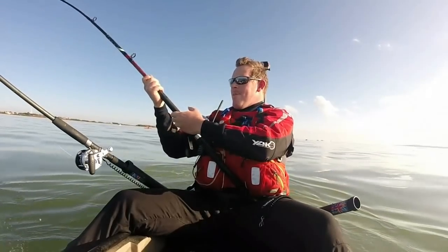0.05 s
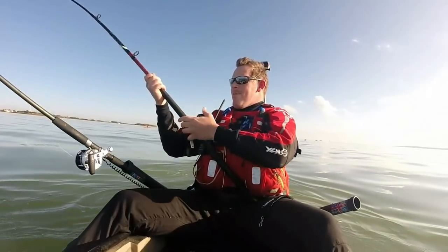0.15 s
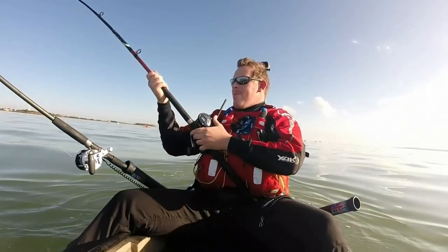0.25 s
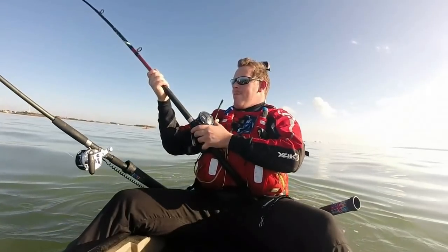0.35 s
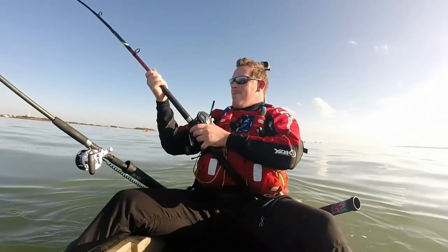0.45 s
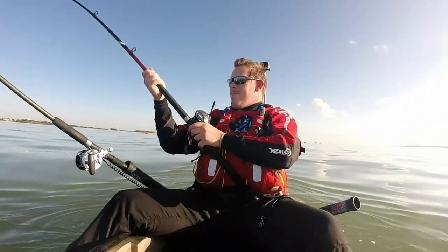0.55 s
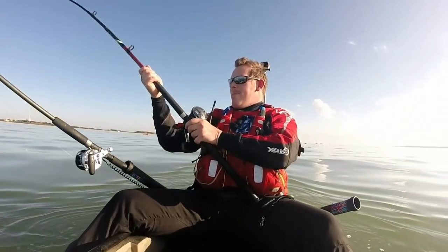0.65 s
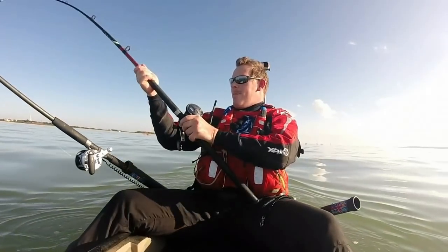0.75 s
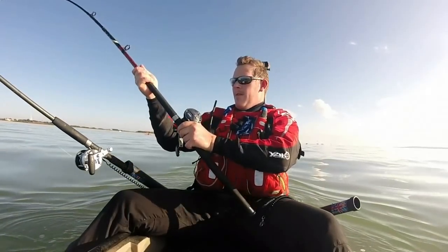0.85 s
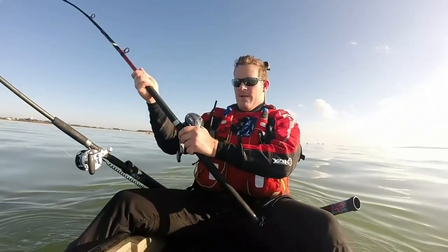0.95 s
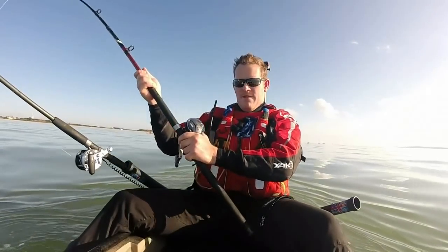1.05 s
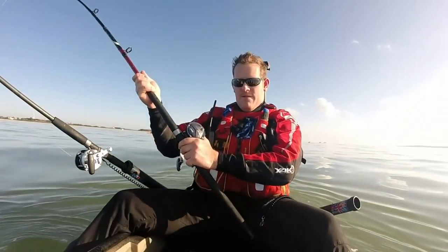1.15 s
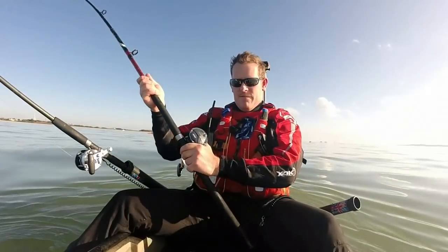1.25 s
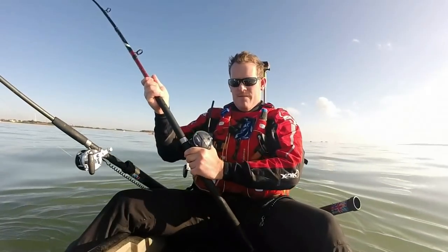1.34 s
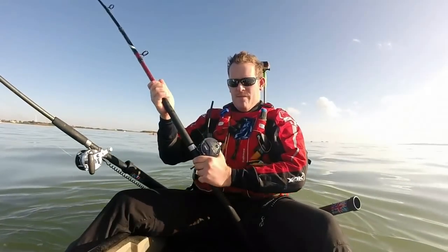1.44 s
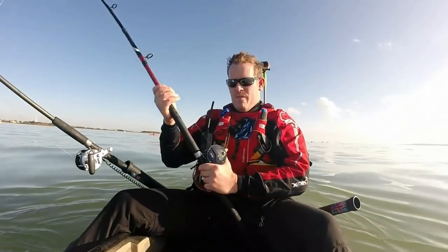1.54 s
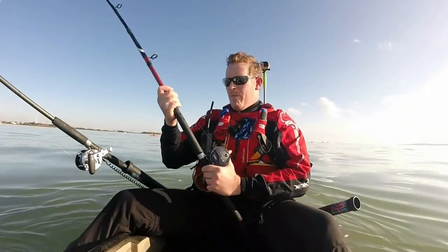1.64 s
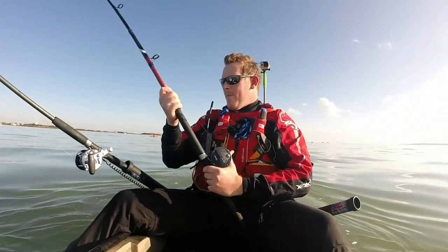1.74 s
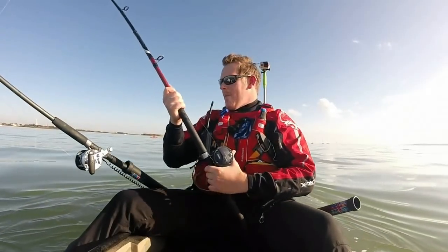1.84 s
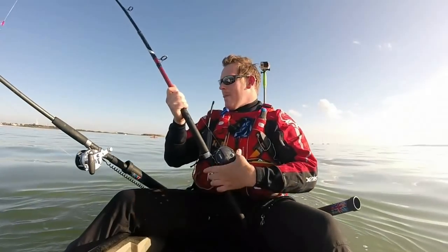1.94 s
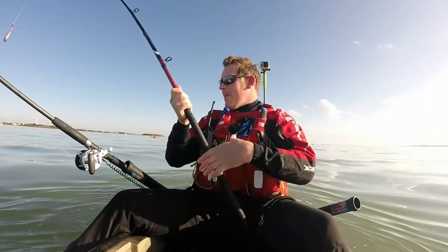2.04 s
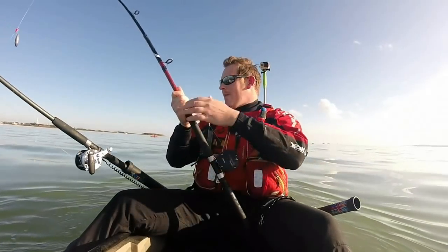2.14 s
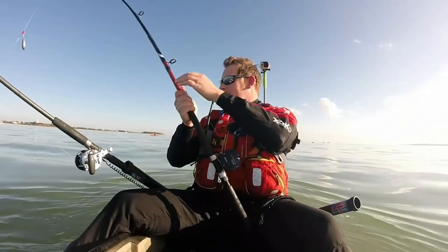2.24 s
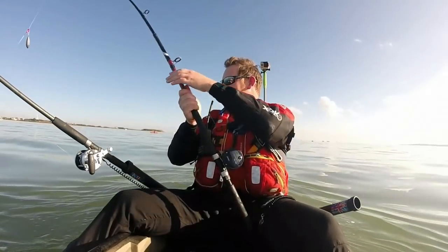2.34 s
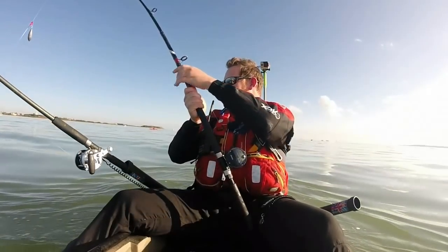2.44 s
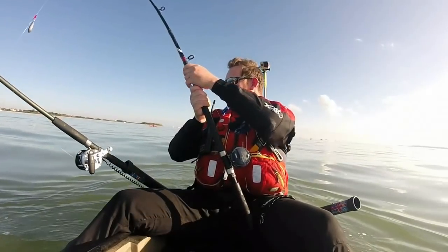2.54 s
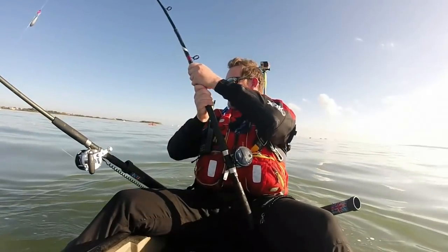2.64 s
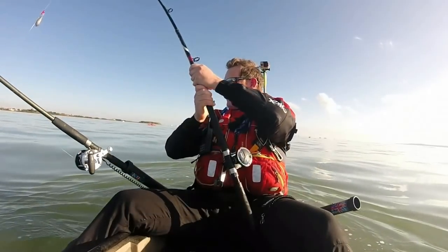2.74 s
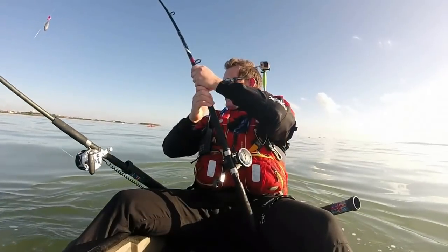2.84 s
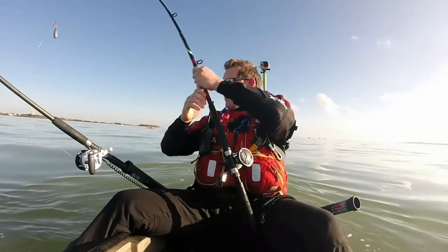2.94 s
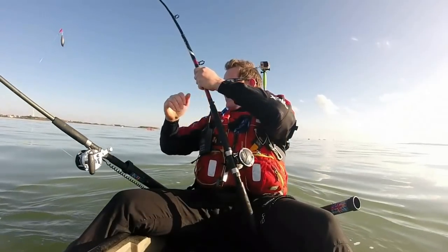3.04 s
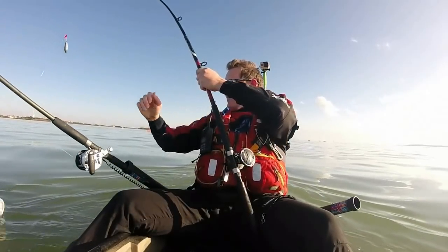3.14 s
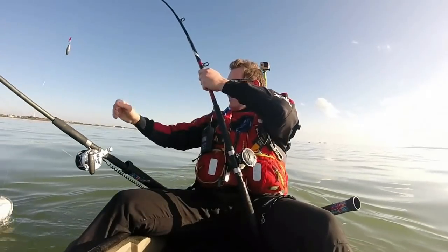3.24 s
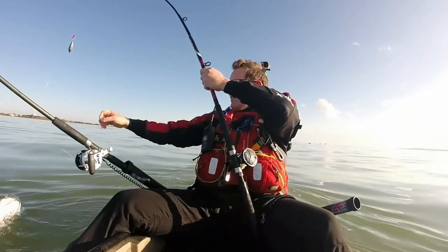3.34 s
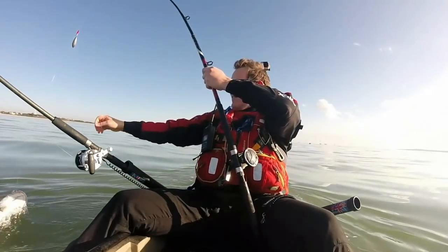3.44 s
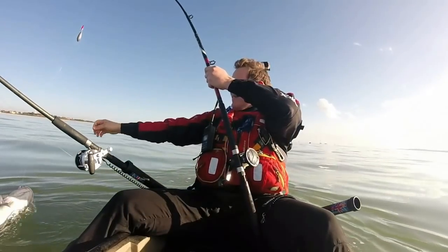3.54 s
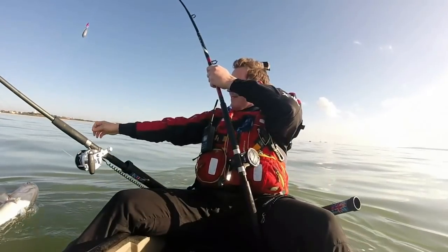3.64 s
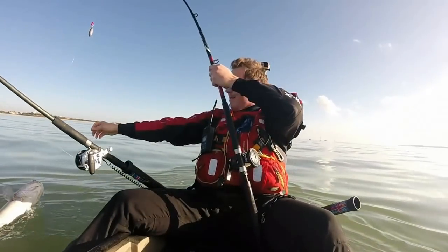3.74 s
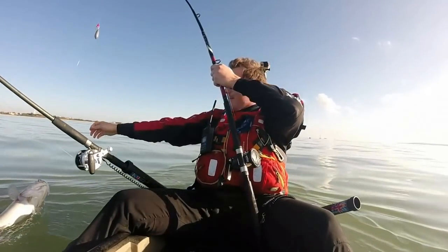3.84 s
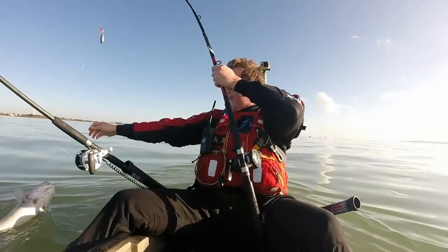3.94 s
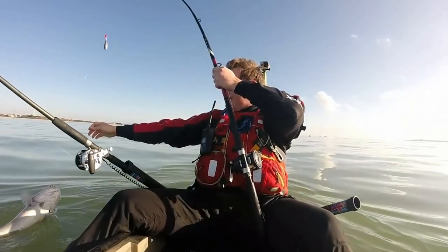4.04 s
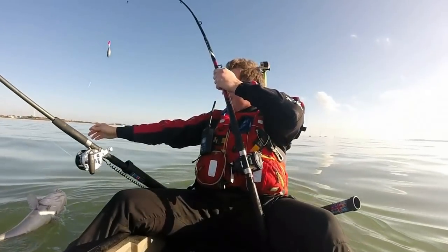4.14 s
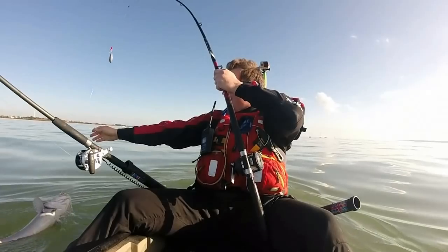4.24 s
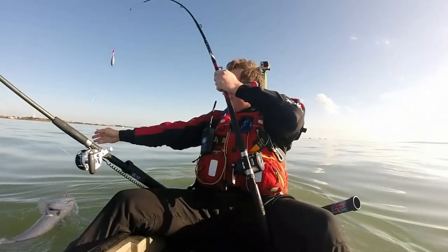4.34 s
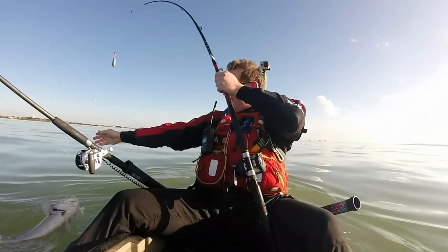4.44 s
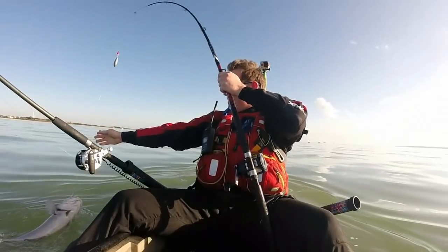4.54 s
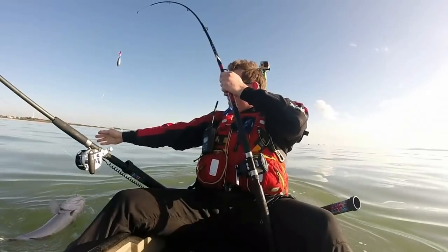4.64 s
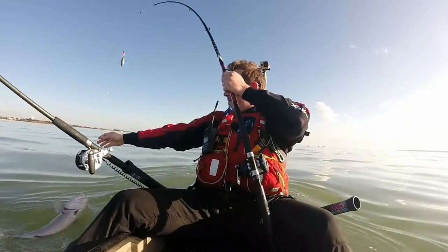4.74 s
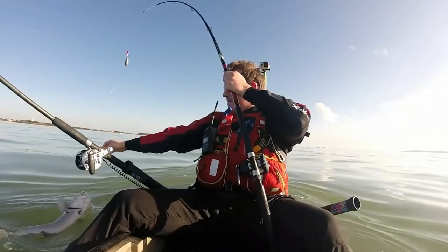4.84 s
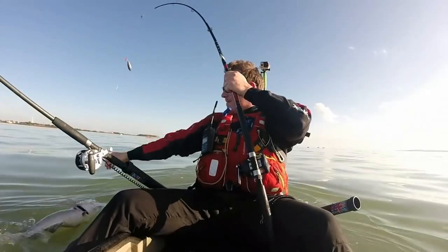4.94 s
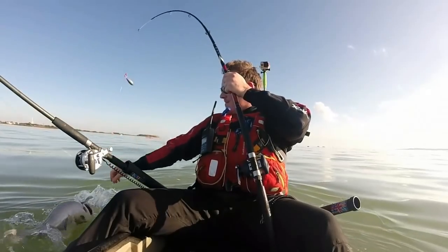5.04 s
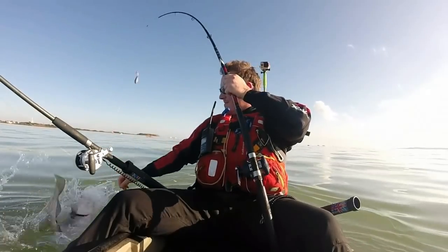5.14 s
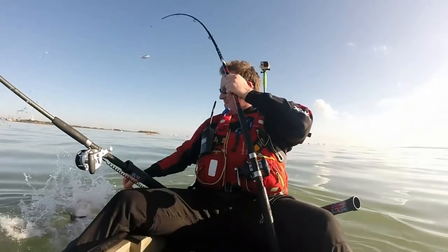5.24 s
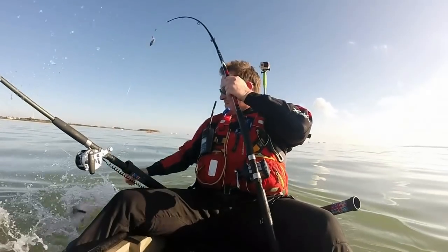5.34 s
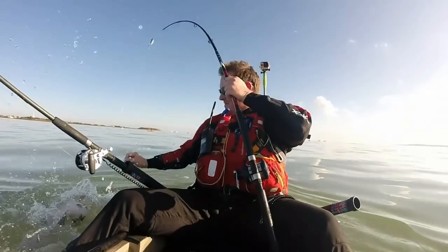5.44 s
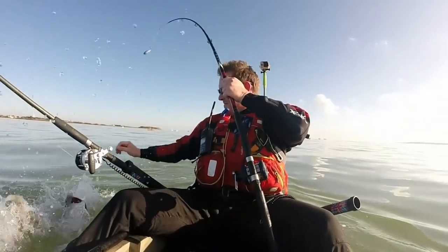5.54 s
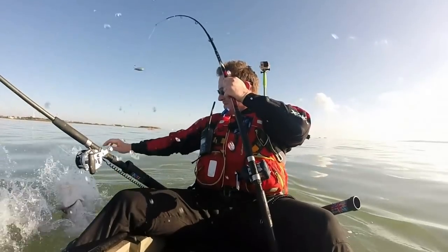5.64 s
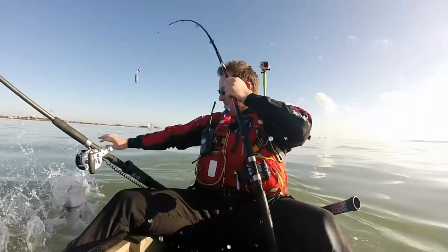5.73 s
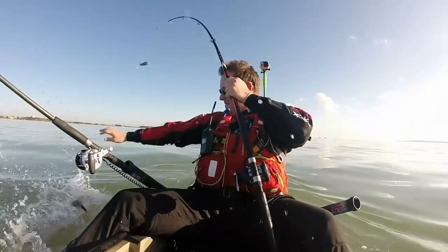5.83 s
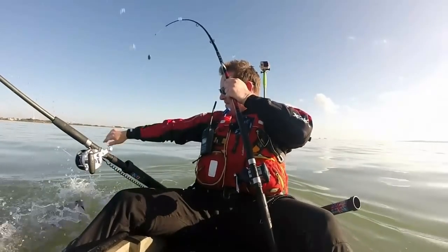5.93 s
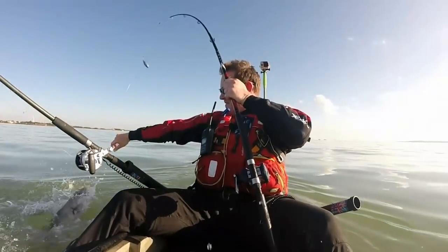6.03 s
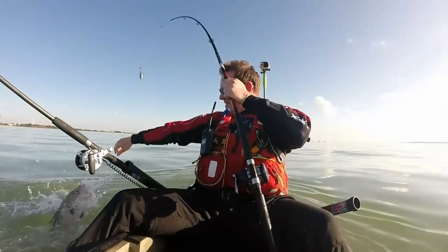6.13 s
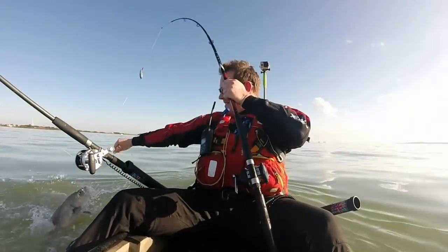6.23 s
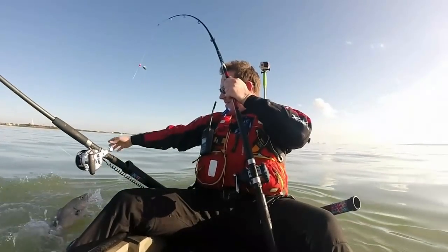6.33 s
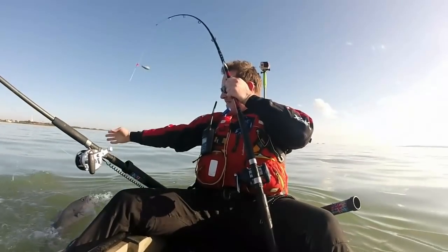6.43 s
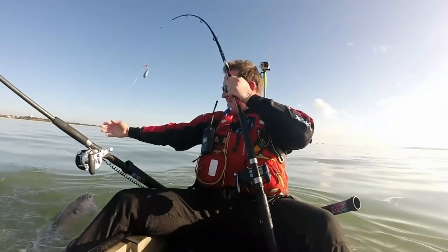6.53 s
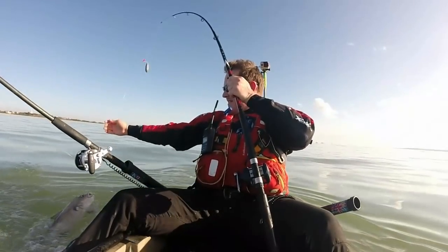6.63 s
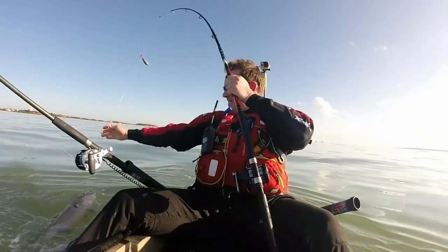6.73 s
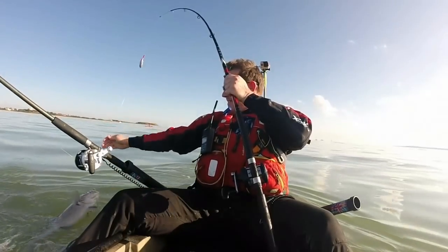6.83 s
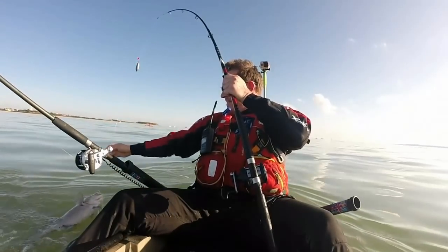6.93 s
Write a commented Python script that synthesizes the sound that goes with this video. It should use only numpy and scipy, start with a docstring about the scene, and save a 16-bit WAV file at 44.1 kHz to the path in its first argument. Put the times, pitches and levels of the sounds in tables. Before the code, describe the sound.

Calm open water heard from inside a waterproof case fixed to a hollow plastic kayak. Small rising bubble plips and faint lapping sit over low rumble and a barely audible hum. Gear thuds softly on the deck, with a harder knock about two seconds in. Later water presses and scrubs along the hull, then a fish thrashes: deep booms, slapping splashes, spray and sharp droplet ticks, settling back to plips.

```python
"""Water laps, churns and drums on the hollow plastic hull of a fishing kayak drifting on calm water.
The microphone is close: inside a camera's waterproof case fixed to the hull, whose resonances colour the water.
Ripples plip as rising bubble notes, wind and swell are narrow-band rumbles, and a faint drone wavers.
Gear knocks on the deck as decaying modes. A hooked fish slides alongside, then thrashes:
surges of filtered noise and ringing grains make churn and spray, and sharp clicks make drops on the case."""
import sys
import numpy as np
from scipy import signal
from scipy.fft import rfft, irfft, next_fast_len
from scipy.io import wavfile
from scipy.ndimage import uniform_filter1d

SR = 44100
rng = np.random.default_rng(int(sys.argv[2]) if len(sys.argv) > 2 else 0)


def store_wav(level_fs):
    """Save 16-bit WAV to argv[1]."""
    pcm = np.round(np.clip(np.atleast_2d(level_fs), -1, 1) * 32767)
    wavfile.write(sys.argv[1], SR, pcm.T.astype(np.int16))


N = 307818
T = np.arange(N) / SR   # time [s]

# Colour of churning water ahead of the case: (frequency [Hz], relative level [dB])
CHURN_SPECTRUM = [(200, -24), (420, 9.5), (560, 6), (780, 4.5), (1100, 1), (1420, -4), (1800, -6),
                  (2700, -4), (3300, -8.5), (6000, -18), (12000, -58)]


def from_db(db):
    """Decibels to gain."""
    return 10 ** (np.asarray(db) / 20)


def rms_one(x):
    """Scale to unit rms."""
    return x / np.sqrt(np.mean(x ** 2) + 1e-20)


def peak_one(x):
    """Scale to unit peak."""
    return x / (np.abs(x).max() + 1e-20)


def in_time(rows):
    """Interpolate each column of a curve at every sample."""
    s, *columns = np.transpose(rows)
    return [np.interp(T, s, column) for column in columns]


def add(out, s, sound):
    """Mix a short sound in at time s."""
    i = max(round(s * SR), 0)
    out[i:i + len(sound)] += sound[:max(N - i, 0)]


def drift(per_s):
    """Random wandering of unit rms: straight lines between per_s random values a second."""
    knots = rng.standard_normal(4096)
    return rms_one(np.interp(T * per_s, np.arange(len(knots)), knots))


def colour(x, spectrum):
    """Causal (minimum-phase) filter with the given spectrum, so impacts keep a sharp start."""
    size = 2 * next_fast_len(len(x) // 2 + 1024)
    hz, db = np.transpose(spectrum)
    bin_hz = np.arange(size // 2 + 1) * SR / size
    log_gain = np.log(from_db(np.interp(np.log(bin_hz + 1), np.log(hz), db)))
    # folding the cepstrum onto positive times gives the minimum phase
    cepstrum = irfft(log_gain)
    cepstrum[1:size // 2] *= 2
    cepstrum[size // 2 + 1:] = 0
    response = np.exp(rfft(cepstrum))
    return irfft(rfft(x, size) * response)[:len(x)]


def resonate(x, hz, width_hz):
    """Two-pole resonance with gain 1 on top."""
    r = np.exp(-np.pi * width_hz / SR)
    zeros = np.array([1, 0, -1]) * (1 - r * r) / 2
    poles = [1, -2 * r * np.cos(2 * np.pi * hz / SR), r * r]
    return signal.lfilter(zeros, poles, x + 1e-18)


def case(x):
    """The waterproof case favours sound at its own resonances, applied one after another."""
    # Case resonances: (frequency [Hz], width [Hz], boost, or cut if negative [dB])
    case_modes = [(1033, 213, 4.5), (1726, 360, 6.5), (2280, 58, 5), (2694, 190, 8.5), (3560, 130, 2.5),
                  (4245, 230, 5), (6287, 286, 13), (7540, 140, 1.5), (8100, 790, -2), (11600, 1200, -3),
                  (13300, 600, 6)]
    for hz, width_hz, boost_db in case_modes:
        x = x + (from_db(boost_db) - 1) * resonate(x, hz, width_hz)
    return x


def rumble(modes, even_s, order=3):
    """Random pressure in steep-sided resonances, its level evened to unit rms over about even_s."""
    x = 0
    for hz, width, db in modes:
        pressure = rng.standard_normal(N)
        # repeated passes steepen the sides; each pass is wider to make up for the narrowing
        for _ in range(order):
            pressure = resonate(pressure, hz, np.sqrt(2 * order) * width)
        x = x + from_db(db) * pressure
    size = int(even_s * SR) + 1
    power = uniform_filter1d(uniform_filter1d(x * x, size), size)
    return x / np.sqrt(np.abs(power) + 1e-20)


def grains(per_s, low_hz, high_hz, cycles, spread_db, count=24):
    """Bubbles and droplets of random size, each ringing for a few cycles at one of count pitches."""
    sizes = from_db(spread_db * np.minimum(rng.exponential(1, N), 4)) * rng.choice([-1, 1], N)
    # the root keeps the level even when grains come thicker
    clicks = sizes * (rng.random(N) < per_s / SR) / np.sqrt(per_s)
    dealt = rng.integers(0, count, N)
    pitches = np.geomspace(low_hz, min(high_hz, SR * 4 / 9), count)
    return rms_one(sum(resonate(clicks * (dealt == k), hz, 2 * hz / cycles)
                       for k, hz in enumerate(pitches)))


def surge():
    """Strength of the water the fish shoves along the side: each shove swells, holds and dies away."""
    # Shoves: (start [s], length before dying away [s], strength [dB])
    shoves = [(2.775, 0.091, -52.5), (3.78, 0.08, -48.5), (3.98, 0.28, -41.5), (4.378, 0.16, -40),
              (5.076, 0.24, -34.5), (5.367, 0.25, -34), (5.718, 0.079, -26.5), (5.863, 0.11, -30.5),
              (6.21, 0.47, -47.5), (6.81, 0.19, -49)]
    attack_s, release_s = 0.035, 0.05   # straight rise, exponential time constant
    strength = 0
    for s, length, db in shoves:
        swell = np.clip((T - s) / attack_s, 0, 1)
        dying = np.exp(-np.maximum(T - s - length, 0) / release_s)
        strength = strength + from_db(db) * swell * dying
    return strength


def hull(lump_db=3.0, lumps_per_s=16):
    """Wind and swell sway the boat; water and the fish's body drum and scrub along its resonances."""
    # Wind and rocking of the boat: (time [s], deep rumble level [dB])
    sway_curve = [(0, -29), (0.3, -41), (0.65, -43), (2.1, -46.5), (2.25, -22), (2.62, -48), (3.12, -46.5),
                  (3.66, -40.5), (3.87, -31.5), (4.65, -30.5), (4.92, -35.5), (5.38, -26), (5.47, -13.5),
                  (5.6, -23), (6.2, -31), (6.98, -39)]
    # Water pressing on the hull: (time [s], heave level [dB], drumming level [dB])
    wash_curve = [(0, -57.5, -49.5), (1.55, -58.5, -46), (1.9, -52.5, -56.5), (2.12, -52, -46.5),
                  (2.23, -34.5, -40), (2.6, -70, -51), (2.86, -41, -43.5), (3.05, -56, -52.5),
                  (3.7, -48.5, -43.5), (4.08, -30.5, -34.5), (4.42, -34, -35.5), (4.53, -21, -32.5),
                  (4.86, -35, -42.5), (5.2, -27, -27), (5.88, -24.5, -21.5), (6.08, -34, -33.5),
                  (6.44, -39, -43), (6.64, -30.5, -31.5), (6.98, -56.5, -43.5)]
    # Hull resonances, deepest first: (frequency [Hz], nominal width [Hz], relative gain [dB])
    sway_modes = [(16.9, 6.24, 6), (40.3, 10.4, -1)]
    heave_modes = [(75.5, 13, -7.5), (94.6, 12.6, -8.5)]
    boom_modes = [(125.4, 15.7, 7.5), (150, 32, -7.5), (180.5, 17.2, -5.5)]
    deck_modes = [(204, 34, -1.5), (263.8, 29.5, 4.5), (321.5, 12, -2), (550, 25.4, -16), (716, 130, -29),
                  (1062, 115, -21)]
    ripple_scrub_db = -58   # ripples on the hull between surges

    sway_db, = in_time(sway_curve)
    heave_db, boom_db = in_time(wash_curve)
    lumps = from_db(lump_db * drift(per_s=lumps_per_s))
    scrub = np.hypot(from_db(ripple_scrub_db), surge()) * lumps
    sway = from_db(sway_db) * rumble(sway_modes, even_s=0.091)
    heave = from_db(heave_db) * rumble(heave_modes, even_s=0.1)
    boom = from_db(boom_db) * rumble(boom_modes, even_s=0.45)
    deck = scrub * rumble(deck_modes, even_s=0.025)
    return sway + heave + boom + deck


def hum(centre_hz=168.5, level_db=-57, waver_hz=2.65, fade_db=3.5):
    """A faint sine whose pitch and level wander, as of a far engine across the water."""
    hz = centre_hz + waver_hz * drift(per_s=23)
    level = from_db(level_db + fade_db * drift(per_s=7))
    return level * np.sqrt(2) * np.sin(2 * np.pi * np.cumsum(hz) / SR)


def shower():
    """Strength of water flung up and falling as spray: each shower builds, holds and thins out."""
    # Showers: (start [s], length before thinning [s], level [dB], fading [dB per s])
    showers = [(-0.15, 0.15, -54.5, 38), (4.98, 0.34, -54.5, 19), (5.403, 0.57, -51, 16)]
    attack_s = 0.17
    power = 0
    for s, length, db, fade in showers:
        build = np.clip((T - s) / attack_s, 0, 1)
        thinning_db = fade * np.maximum(T - s - length, 0)
        power = power + (build * from_db(db - thinning_db)) ** 2
    return np.sqrt(power)


def water(mist_db=2.0, froth_db=6.5, surge_db=2.5, lapping_db=-1.0, calm_db=-2.5):
    """Ringing bubbles and droplets over a fine hiss: surges strengthen the churn, showers the spray."""
    # Colour of falling spray ahead of the case: (frequency [Hz], relative level [dB])
    spray_spectrum = [(1500, -33), (2800, -5), (3600, -2.5), (5200, -3), (6500, -10), (7500, -9),
                      (8400, -11.5), (11000, -11), (13500, -21.5), (15000, -21)]
    calm_churn_db, calm_spray_db = -58.5, -64.5   # the water at rest
    churn_re_surge_db, churn_follows = -32, 0.54   # exponent below 1: bubbling grows slower than the shove

    surging = from_db(churn_re_surge_db) * surge() ** churn_follows
    churning = np.hypot(from_db(calm_churn_db), surging)
    falling = np.hypot(from_db(calm_spray_db), shower())
    # heavier spray brings more grains and lumpier levels
    busy = (falling / falling.min()) ** 0.7
    unrest = busy / busy.max()
    graininess = from_db(calm_db * (1 - unrest))

    bubbles = graininess * grains(300 * busy, 565, 3637, cycles=38, spread_db=4.0)
    bubbles = bubbles + from_db(froth_db) * rng.standard_normal(N)
    droplets = graininess * grains(700 * busy, 2660, 13000, cycles=39, spread_db=5.5)
    droplets = droplets + from_db(mist_db) * rng.standard_normal(N)

    churn_lumps_db = surge_db * unrest * drift(per_s=24) + lapping_db * drift(per_s=6.2)
    spray_lumps_db = 3.3 * unrest * drift(per_s=49) + 0.4 * (2 - unrest) * drift(per_s=8.1)
    churn = churning * from_db(churn_lumps_db) * rms_one(case(colour(bubbles, CHURN_SPECTRUM)))
    spray = falling * from_db(spray_lumps_db) * rms_one(case(colour(droplets, spray_spectrum)))
    return churn + spray


def slaps(level_db=-1.0, bubbles_db=1.0):
    """Each sheet of water slaps down as a short, dense burst of froth and bubbles."""
    # Sheets of water landing: (time [s], relative level [dB], time scale of the burst [s])
    sheets = [(0.002, -41, 0.039), (0.113, -45, 0.039), (1.103, -43.5, 0.042), (2.77, -55, 0.044),
              (5.087, -48, 0.02), (5.191, -28, 0.038), (5.256, -34.5, 0.068), (5.355, -26.5, 0.033),
              (5.449, -27, 0.025), (5.508, -27, 0.01), (5.696, -36, 0.014), (5.775, -28, 0.024),
              (5.96, -35, 0.0062), (6.128, -36, 0.023), (6.176, -29.5, 0.031), (6.703, -36, 0.014)]
    bubbles = grains(1500, 563, 2980, cycles=5.9, spread_db=7.0)
    froth = rng.standard_normal(N) + from_db(bubbles_db) * bubbles
    froth = rms_one(case(colour(froth, CHURN_SPECTRUM)))
    swell, t = np.zeros(N), T[:SR // 4]
    for s, sheet_db, length in sheets:
        age = 2 * t / length
        burst = peak_one(age * np.exp(-age ** 1.5))
        add(swell, s, from_db(sheet_db + level_db) * burst)
    return swell * froth / 2


def faint_plips():
    """Small plips at random moments, levels and pitches: rows like those of the clear plips."""
    per_s, centre_db, spread_db = 4, -48, 1.5
    centre_hz, spread_octaves = 2675, 0.7
    count = int(per_s * N / SR)
    size, pitch = rng.standard_normal((count, 2)).T
    hz = np.clip(centre_hz * 2 ** (spread_octaves * pitch), 600, 6500)
    return list(zip(rng.uniform(0, N / SR, count), centre_db + spread_db * size, hz))


def plips(level_db=-1.5, cycles=52, glide_per_s=4.2, wet_db=-8.5, wet_t60=0.021, rise_s=0.0007):
    """A ripple closes on a pocket of air: a wet spatter and a short, rising bubble note."""
    # Clearest plips of lapping water: (time [s], relative level [dB], starting bubble pitch [Hz])
    clear_plips = [(0.0088, -33.5, 4200), (0.0274, -39.5, 1680), (0.0463, -34, 4100), (0.1173, -32.5, 4100),
                   (0.7478, -42, 5930), (0.913, -36.5, 3210), (0.9808, -40, 5270), (1.0727, -39, 2620),
                   (1.074, -42.5, 717), (1.6392, -38.5, 1610), (1.9854, -36.5, 3970), (2.2035, -38, 2700),
                   (2.252, -38.5, 6030), (2.4227, -33.5, 2600), (2.695, -42.5, 920), (3.1443, -41.5, 2740),
                   (3.3659, -34, 2830), (3.555, -42, 600), (3.5916, -35.5, 2670), (3.697, -37.5, 2650),
                   (3.798, -29, 625), (4.065, -33.5, 2750), (4.139, -38.5, 1510), (6.136, -32, 1380),
                   (6.2998, -38.5, 1080), (6.3988, -33, 2570), (6.5661, -32, 4550), (6.612, -38, 1680),
                   (6.6457, -29, 1684), (6.7065, -40, 5600), (6.777, -39.5, 6000), (6.8406, -35.5, 4740),
                   (6.9175, -35, 1415)]
    out, t = np.zeros(N), T[:SR // 12]
    for s, plip_db, hz in list(clear_plips) + faint_plips():
        # the note falls by 60 dB in the given cycles of its starting pitch
        note = np.sin(2 * np.pi * hz * t * (1 + glide_per_s * t / 2)) * from_db(-60 * t * hz / cycles)
        spatter = rng.standard_normal(len(t))
        for _ in range(2):
            spatter = resonate(spatter, hz, 0.68 * hz)
        spatter = case(spatter) * from_db(-60 * t / wet_t60)
        plip = note + from_db(wet_db) * 2 * peak_one(spatter)
        plip = plip * (1 - np.exp(-t / rise_s))
        add(out, s, from_db(plip_db + level_db) * peak_one(plip))
    return out


def knocks(flex_db=-8.0, boom_db=0.0, ring_db=0.0, clack_db=-2.5):
    """Gear knocks on the hollow deck: each blow sets off decaying modes, the deep ones mostly swelling slower."""
    # Blows on the hull: (time [s], level [dB], then shares of flexing, boom, deck ring and clack [dB])
    blows = [(0.3, -17.5, 5, -17, -48, -47), (0.684, -21.5, -35, -2.5, -8.5, -40),
             (1.916, -34.5, -19, -0.5, -7.5, -10), (2.208, -11, -14, -7, -10.5, -10),
             (2.446, -20.5, -4, -16, -25, -15.5), (3.453, -21, -12, -1.5, -7.5, -19),
             (3.797, -24.5, -21, -10, -10, -18), (4.524, -18, -21, -7, -7, -36),
             (5.25, -3, -20, -3, -15, -53), (5.524, -11, -17, -5.5, -8.5, -50),
             (5.785, -6.5, -5.5, -6, -16, -14), (6.145, -11.5, -15, -4, -11, -34),
             (6.191, -4.5, -9.5, -11.5, -20.5, -25)]
    # Struck hull, deep flexing to deck clack: (nominal pitch [Hz], gain [dB], t60 [s], rise constant [s])
    flex_modes = [(40.1, 0, 0.39, 0.0085)]
    boom_modes = [(126.2, -1.6, 0.18, 0.0065), (148.5, -1.4, 0.14, 0.0085)]
    ring_modes = [(214.7, 1, 0.1, 0.0087), (256.6, 5.5, 0.13, 0.0056), (323, 0.5, 0.061, 0.0055)]
    clack_modes = [(357, 10.5, 0.11, 0.0023), (405, -0.5, 0.09, 0.012), (561, 12, 0.066, 0.00066),
                   (647, -7, 0.072, 0.0038), (796, 3.5, 0.039, 0.0014), (907, -5.5, 0.058, 0.002),
                   (1156, 1, 0.048, 0.001)]
    families = [(flex_modes, flex_db), (boom_modes, boom_db), (ring_modes, ring_db), (clack_modes, clack_db)]

    out, t = np.zeros(N), T[:SR // 2]
    for s, blow_db, *shares in blows:
        for (modes, family_db), share_db in zip(families, shares):
            blow = 0
            for hz, db, t60, rise in modes:
                struck_hz = hz * (1 + 0.018 * rng.normal())   # each blow is tuned a little differently
                envelope = from_db(db - 60 * t / t60) * (1 - np.exp(-(t / rise) ** 2))
                blow = blow + envelope * np.sin(2 * np.pi * struck_hz * t)
            add(out, s, from_db(blow_db + share_db + family_db) * peak_one(blow))
    return out


def drops(tick_db=-0.5, slap_db=12.5, spatter_db=-19.0, spatter_t60=0.028, slap_spatter_db=-28.0):
    """Flung drops hit the case: one sharp impact, then a brief spatter, as bright tick and dull slap."""
    # Drops striking the case: (time [s], relative level [dB], share of dull slap [dB])
    hits = [(5.3112, -13.5, -30), (5.3165, -29, -14), (5.3215, -25, -11), (5.4225, -39, -14),
            (5.456, -24, -9), (5.692, -30, -7), (5.8249, -17, 1), (5.8603, -28, -19), (5.8768, -26, -20),
            (6.1194, -41, -10), (6.143, -35, -10)]
    # Colours ahead of the case: (frequency [Hz], relative level [dB])
    tick_spectrum = [(500, -63), (3000, -18), (5000, -4.5), (7000, -6), (8500, -9.5), (11000, -17),
                     (15000, -25)]
    slap_spectrum = [(300, -7), (1000, -6.5), (1900, -0.5), (3300, 2.5), (4500, -10), (10000, -25)]
    out, t = np.zeros(N), T[:SR // 16]
    impact = (t == 0) * 1.
    for s, drop_db, slap_share_db in hits:
        spatter = rng.standard_normal(len(t)) * from_db(-60 * t / spatter_t60)
        tick = peak_one(case(colour(impact + from_db(spatter_db) * spatter, tick_spectrum)))
        slap = peak_one(case(colour(impact + from_db(slap_spatter_db) * spatter, slap_spectrum)))
        drop = from_db(tick_db) * tick + from_db(slap_db + slap_share_db) * slap
        add(out, s, from_db(drop_db) * drop)
    return out


def scene():
    """Open water: no echoes, one channel."""
    return (hull() + hum() + water() + slaps() + plips() + knocks() + drops())[None]


def record(dry):
    """The recorder clips at full scale and cuts the top of the treble."""
    stop_hz = 15900   # 60 dB down from here up
    low_pass = signal.cheby2(14, 60, stop_hz, fs=SR, output="sos")
    return signal.sosfilt(low_pass, np.clip(dry, -1, 1))


dry = scene()
out = record(dry)
store_wav(out)
```